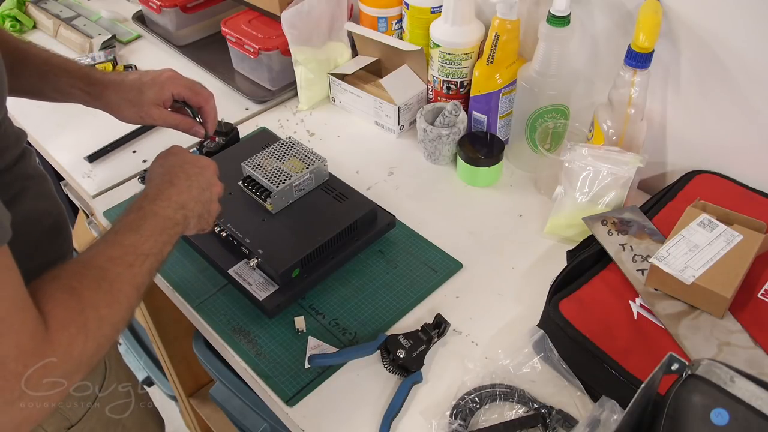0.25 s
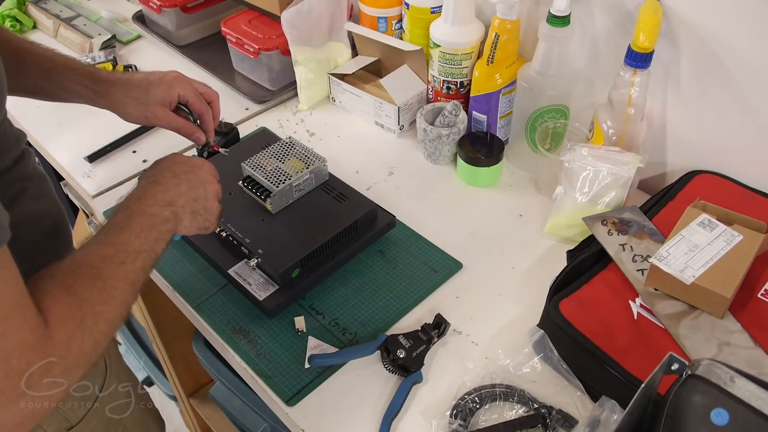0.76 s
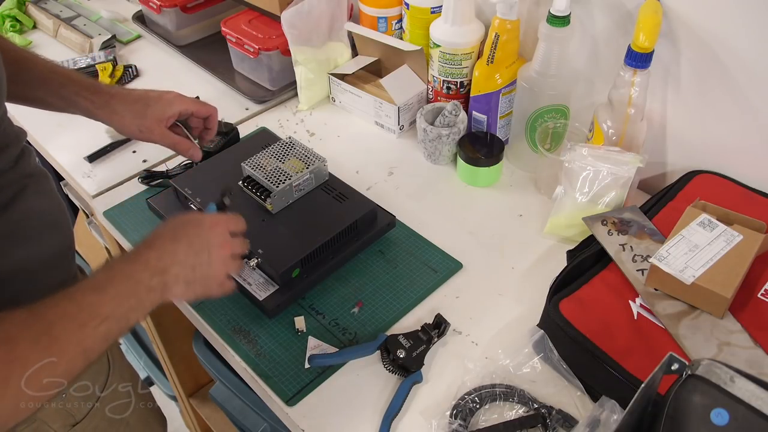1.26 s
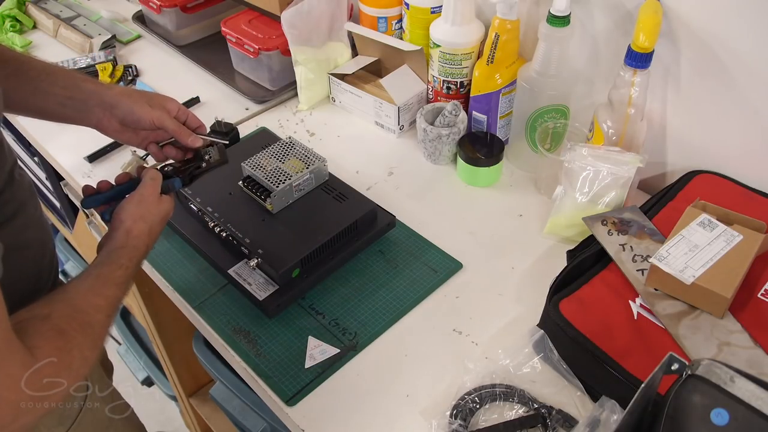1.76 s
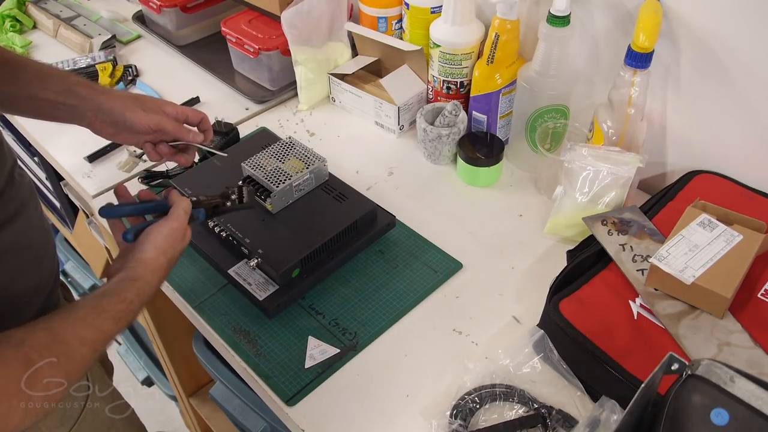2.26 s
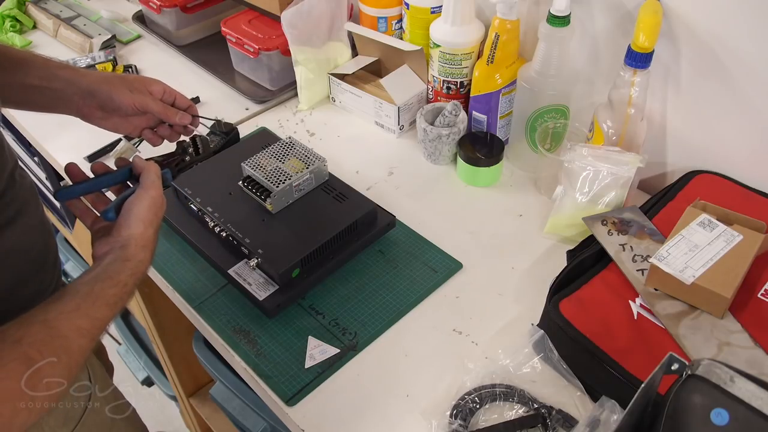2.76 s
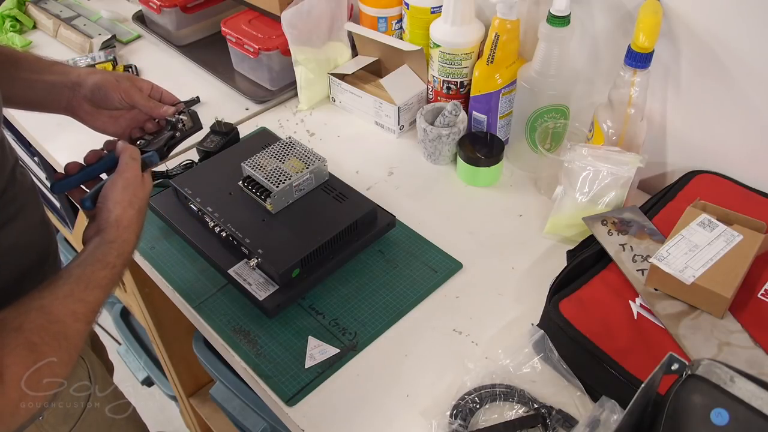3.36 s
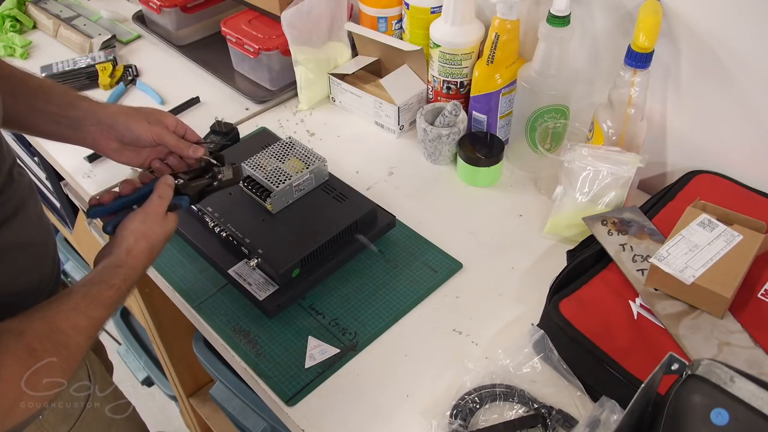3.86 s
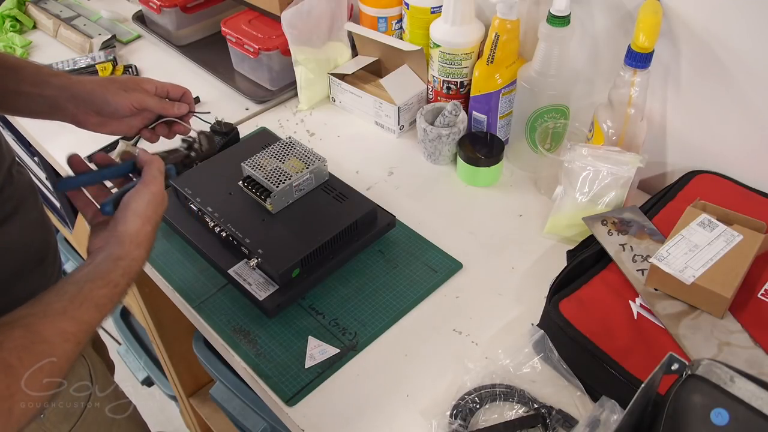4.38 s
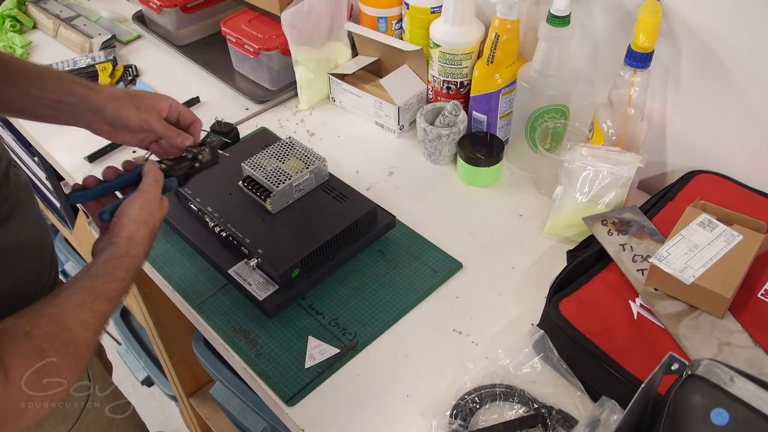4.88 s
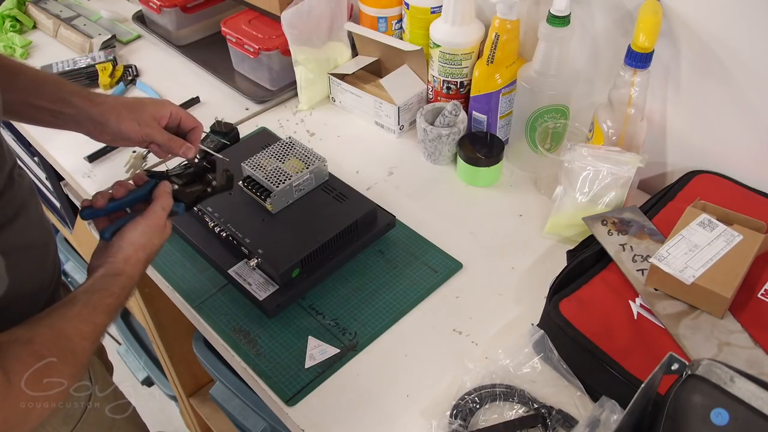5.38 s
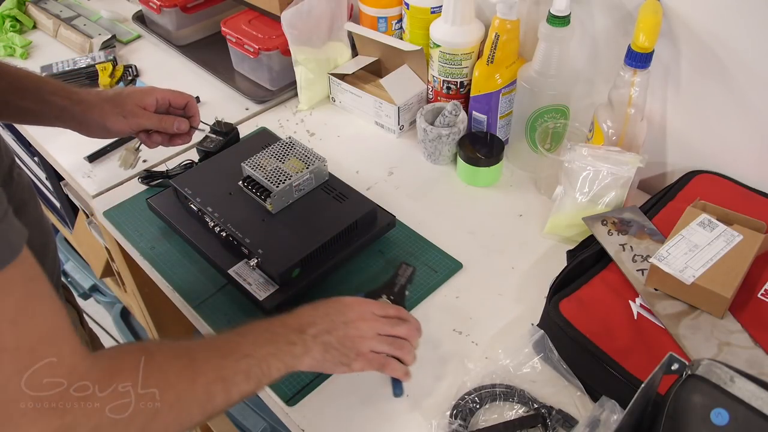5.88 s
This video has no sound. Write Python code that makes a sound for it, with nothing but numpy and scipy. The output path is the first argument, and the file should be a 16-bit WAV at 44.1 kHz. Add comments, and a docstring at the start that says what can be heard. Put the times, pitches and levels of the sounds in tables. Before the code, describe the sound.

One hard wire snip and tiny bouncing ticks, followed by three very loud steel stripper snaps with small creaks between, in a humming, hard-walled workroom.

```python
"""Snipping and stripping wire at a workbench

A fan hums in a hard-walled room: wavering sines over a background of three bands of shaped noise.
A cutter snips a wire and the offcut bounces on the bench; then a sprung steel stripper bites, creaks
through its linkage and snaps shut three times. Each contact is gritty noise over decaying modes, answered by
a hiss from the room; damped swings add dull knocks and short thuds. The nearly mono sound clips on the snaps."""
import sys
import numpy as np
from scipy import signal
from scipy.fft import rfft, irfft, next_fast_len
from scipy.io import wavfile
from scipy.ndimage import uniform_filter1d, map_coordinates

SR = 44100
rng = np.random.default_rng(int(sys.argv[2]) if len(sys.argv) > 2 else 0)


def wav_out(sig):
    """Save sig, one row per channel (or a flat mono array), as 16-bit PCM at SR to the path in sys.argv[1]."""
    wavfile.write(sys.argv[1], SR, np.round(np.clip(np.atleast_2d(sig).T, -1, 1) * 32767).astype(np.int16))


N = 270112  # samples in the scene

# Spectra of relative power density: (f/Hz, level/dB per Hz). Each noise is levelled after shaping.
RUMBLE_SPECTRUM = [(12, -42.5), (20, -17.5), (27, -17), (48, -8), (64, 2), (91, -14), (110, 0.5),
                   (140, -26.5), (240, -120)]
RUSH_SPECTRUM = [(53, -59.5), (90, -25), (113, -13.5), (144, -12.5), (166, -8), (204, -7), (283, -3),
                 (347, -7.5), (405, -8), (452, -11.5), (589, -11), (825, -15), (953, -17), (1040, -18.5),
                 (1600, -38.5), (2080, -53), (3520, -120)]
HISS_SPECTRUM = [(650, -31), (1100, -1.5), (1360, -1.5), (1630, -3.5), (2970, -10), (3360, -8), (3600, -11),
                 (4930, -17), (8970, -26), (13900, -31), (16300, -39)]
WIDTH_SPECTRUM = [(18, -45), (30, -14.5), (131, -26.5), (194, -30.5), (239, -12), (295, -23.5),
                  (404, -11.5), (473, -12), (1010, 7), (3670, -22.5), (4300, -29), (14000, -17.5),
                  (16000, -25.5)]  # the part that differs between the channels
BENCH_CRACK = [(60, -120), (350, -38), (700, -21.5), (1300, -9), (1900, -4), (2800, -4.5), (3800, 2),
               (5000, -10), (6000, -6), (9000, -13), (13800, -8.5), (16000, -22)]
JAW_CRACK = [(60, -120), (400, -50), (900, -27.5), (1800, -12.5), (2500, -11.5), (3000, -1), (4200, -5),
             (5200, -4), (6700, 3), (10000, -0.5), (14500, -3), (16000, -8)]
# Background level over time; the hiss drops abruptly near 1.43 s and lifts faintly near 3.3 s:
# (t/s, rumble level/dB, rush level/dB, hiss level/dB)
BACKGROUND_LEVELS = [(0, -60, -44.5, -53), (1.41, -61, -45, -53), (1.45, -63, -45.5, -57),
                     (2.3, -69, -47, -56), (3.15, -68, -46.5, -57), (3.28, -68, -46, -54.5),
                     (3.55, -68, -47, -57), (6.12, -71, -46, -57)]
# Fan motor tones: (f/Hz, level/dB, waver/Hz, swell/dB)
FAN_TONES = [(59.3, -71, 2.2, 1), (168.9, -60.5, 9.2, 5), (292.8, -57.5, 14, 4), (593, -65.5, 5, 2.5),
             (871, -67, 4.5, 0.5), (929, -57, 3, 2), (988, -65, 4, 0.5), (1425, -70.5, 8.8, 2.5)]
# Resonances in low, high and frame groups: (f/Hz, relative level/dB, t60/s)
BENCH_MODES = {"low": [(1400, -6, .018), (1650, -2, .024), (1900, 0, .026), (2300, -6, .016)],
               "high": [(3100, -4, .012), (3400, 0, .016), (8200, -26, .05)], "frame": [(2750, -15, .025),
               (3300, -15, .03), (3550, -14, .04), (3720, -12, .045), (4060, -11, .04), (4430, -14, .03)]}
JAW_MODES = {"low": [(1700, -8, .01), (2200, 0, .014), (2600, -5, .012), (3400, -4, .018)],
             "high": [(7400, -9, .025), (10700, -12, .03), (12250, -3, .06), (12440, 0, .09),
             (14000, -9, .04)], "frame": [(3060, -18.5, .045), (3100, -31, .14), (3660, -32, .07),
             (4440, -30, .05)]}
# Reverberation time of the hard walls: (f/Hz, t60/s)
WALL_DECAY = [(500, 0.27), (2000, 0.7), (4000, 0.9), (7000, 0.65), (11000, 0.39), (16000, 0.32)]
# Dull knocks passed into the bench and the hand: (t/s, level/dB, f/Hz, t60/s)
KNOCKS = [(0.9111, -27, 438, 0.036), (1.023, -21, 650, 0.048), (1.1935, -36, 691, 0.033),
          (1.8585, -33.5, 1060, .03)]
# Character of each kind of contact:
# (rattle t60/s, tilt/dB per octave, low modes level/dB, high modes level/dB)
CONTACT_SOUND = {"nip": (.033, -4, 2.5, -13), "shear": (.077, 0, -13, -21), "snip": (.032, 4, -26, -9),
                 "touch": (.04, -3, -20, -40), "bite": (.033, -2, -9, -40), "creak": (.026, 4, -40, -20),
                 "ping": (.05, 2, -40, -3), "slide": (.05, -1.5, -40, -40), "slam": (.055, 1, -25, -35),
                 "snap": (.024, .5, -17, -26), "rebound": (.04, 2, -40, 6)}

# All contact levels below are relative; blows() trims them.
# The cutter closing through the wire: (kind, t/s, level/dB)
CUTTER = [("nip", .9095, -21.5), ("shear", 1.0216, -3.5), ("snip", 1.023, 0)]
# The offcut on the bench: (t/s, level/dB, low modes level/dB, high modes level/dB)
BOUNCES = [(1.1936, -35, 14, -5), (1.1985, -40, 11, -5), (1.2115, -14.5, -4, -1), (1.2376, -31, 0, -3),
           (1.2458, -36, 12, -3), (1.253, -41, 7, -5), (1.268, -40, 2, -4), (1.2825, -38, 0, -6),
           (1.2853, -22, -8, 3), (1.3055, -37, -2, -2), (1.3103, -33, -10, 9), (1.3158, -33, -9, 2),
           (1.3295, -35, -9, 0), (1.344, -41, -4, 0), (1.36, -43, -4, 3), (1.3915, -43, 2, -10)]
# Jaws meeting the wire: (t/s, level/dB)
TOUCHES = [(1.8562, -21), (1.859, -26), (3.754, -37), (3.760, -35), (5.187, -29.5), (5.195, -34.5)]
# Jaws clamping: (t/s, level/dB)
BITES = [(1.8678, -21), (3.7655, -20), (5.2022, -21.5)]
# Faint bright ticks: (t/s, level/dB)
CREAKS = [(2.0575, -37), (2.067, -38), (2.078, -38), (2.1155, -27), (3.155, -47), (3.2044, -52),
          (3.8826, -42), (3.9126, -41), (4.754, -51), (5.3115, -50), (5.3293, -39), (5.4015, -45),
          (5.4337, -35), (5.567, -37), (6.0894, -52)]
# Ticks that ring the spring: (t/s, level/dB)
PINGS = [(2.089, -30.5), (2.094, -28), (3.8908, -38), (3.9505, -30), (5.409, -34)]
# Linkage clicks: (t/s, level/dB, rattle t60/s, tilt/dB per octave)
CLICKS = [(2.1082, -12, .033, 6), (3.925, -26.5, .032, -5), (3.965, -16.5, .036, 0),
          (5.366, -27, .025, -3.5), (5.44, -18.5, .041, 1.5), (5.669, -35, .03, -6)]
# Jaws snapping shut: (t/s, snap level/dB, slam level/dB, rebound level/dB, thud level/dB)
SNAPS = [(2.1508, 2.5, -21, -24, -26), (3.9988, 2.5, -11.5, -22, -25), (5.4783, 2, -13, -38, -14)]

WIDTH_DB = -68  # rms of the difference added to one channel and taken from the other
BOUNCE_T60_S, BOUNCE_GROWTH = .027, .3  # rattle of a -20 dB bounce; dB longer per dB harder
BOUNCE_TILT_DB = -6  # per octave
CLICK_LOW_DB, CLICK_HIGH_DB = -5, -28  # mode levels of a linkage click
SLIDE_LEAD_S, SLAM_LEAD_S, SLIDE_DB = .013, .0075, -13  # leads before the snap; slide relative to slam
REBOUND_DELAY_S = .011  # after the snap; the rebound sets the spring ringing
THUD_DELAY_S, THUD_HZ, THUD_T60_S = .0007, 80, .0045  # the push into the hand, just after the snap
BAND_LIMIT_HZ = 16150  # middle of the top roll-off


def amp(db):
    """Decibels to amplitude."""
    return 10 ** (np.asarray(db) / 20)


def unit(x):
    """Scale a signal to rms 1."""
    return x / np.sqrt(np.mean(x ** 2) + 1e-20)


def along(points, hz):
    """Read (f/Hz, value) points on a log frequency axis."""
    f, value = np.transpose(points)
    return np.interp(np.log(hz + 1), np.log(f + 1), value)


def tilted(spectrum, hz, tilt_db):
    """A dB spectrum tilted about 4 kHz per octave; the tilt stays level below 800 Hz."""
    return along(spectrum, hz) + tilt_db * np.log2(np.maximum(hz, 800) / 4000)


def wobble(rate):
    """A smooth random curve through rate knots a second."""
    knots = rng.standard_normal(int(N * rate / SR) + 4)
    return map_coordinates(knots, [np.arange(N) * rate / SR])


def filtered(x, response):
    """Shape a signal by a gain given as a function of frequency."""
    size = next_fast_len(x.shape[-1] + 8192)
    gain = response(np.fft.rfftfreq(size, 1 / SR))
    return irfft(rfft(x, size) * gain, size)[..., :x.shape[-1]]


def noise(spectrum, size, tilt_db=0):
    """Coloured noise of rms 1."""
    white = rng.standard_normal(size)
    return unit(filtered(white, lambda hz: amp(tilted(spectrum, hz, tilt_db))))


def fan_and_background():
    """Slightly unsteady motor tones over a background of rumble, rush and hiss from shaped noise."""
    t, *levels = np.transpose(BACKGROUND_LEVELS)
    rumble_db, rush_db, hiss_db = [np.interp(np.arange(N) / SR, t, level) for level in levels]
    tones = np.zeros(N)
    for hz, db, waver_hz, swell_db in FAN_TONES:
        level = np.sqrt(2) * amp(db + swell_db * wobble(12))  # rms to peak
        phase = 2 * np.pi * np.cumsum(hz + waver_hz * wobble(25)) / SR
        tones += level * np.sin(phase)
    rumble = amp(rumble_db) * noise(RUMBLE_SPECTRUM, N)
    rush = amp(rush_db + 0.92 * wobble(9)) * noise(RUSH_SPECTRUM, N)
    hiss = amp(hiss_db + .3 * wobble(4.3)) * noise(HISS_SPECTRUM, N)
    return tones + rumble + rush + hiss


def stereo_width():
    """Faint noise in opposite polarity on the two channels opens the image slightly."""
    wide = amp(WIDTH_DB) * noise(WIDTH_SPECTRUM, N)
    return np.array([wide, -wide])


def ringing(modes, t):
    """Decaying sines of the struck metal or bench, each at a fresh random strength."""
    ring = np.zeros(len(t))
    for hz, db, t60 in modes:
        ring += amp(db + rng.normal(0, 2) - 60 * t / t60) * np.sin(2 * np.pi * hz * t)
    return ring


def echo(fill_s, size):
    """A fresh room tail of energy 1: it fills up while each frequency dies at its own speed."""
    hz, t, bins = signal.stft(rng.standard_normal(size), SR, nperseg=256)
    decay = amp(-60 * t / along(WALL_DECAY, hz)[:, None])
    fill = 1 - np.exp(-t / fill_s)
    tail = signal.istft(bins * decay * fill, SR, nperseg=256)[1]
    return tail / np.linalg.norm(tail)


def blows(rows, crack, modes, grain_db, wet_db, wet_ring_db):
    """Each contact is a burst of tiny impacts over ringing modes; the room returns rattle and frame."""
    out, t = np.zeros(N + SR), np.arange(SR // 8) / SR
    for start_s, db, t60, tilt_db, low_db, high_db in rows:
        t60 = max(t60, .004)
        rise = 1 - np.exp(-t / (8 * t60 ** 3))  # long scrapes swell, short knocks start almost at once
        fade = amp(-60 * t / t60) * rise
        energy = np.linalg.norm(fade)

        grit = amp(grain_db * unit(uniform_filter1d(rng.standard_normal(len(t)), size=20)))  # uneven impacts
        rattle = noise(crack, len(t), tilt_db) * fade * grit
        rattle *= energy / np.linalg.norm(rattle)
        low = amp(low_db) * ringing(modes["low"], t)
        high = amp(high_db) * ringing(modes["high"], t)
        ring = rise * (low + high)
        frame = rise * amp(.6 * db) * ringing(modes["frame"], t)  # grows faster than the blow

        # faint tails soon sink under the fan, so they are cut short
        tail = echo(fill_s=.04, size=3 * SR // 4 if db > -7 else SR // 4)
        wash = filtered(tail, lambda hz: amp(tilted(crack, hz, tilt_db)))  # the rattle comes back as even hiss
        wash *= energy / np.linalg.norm(wash)
        wet_frame = signal.fftconvolve(frame, tail)[:len(tail)]
        wet = amp(wet_db) * wash + amp(wet_ring_db) * wet_frame

        start = round(start_s * SR)
        out[start:][:len(t)] += amp(db - 6) * (rattle + ring + frame)
        out[start:][:len(wet)] += amp(db - 9) * wet
    return out[:N]


def bench_contacts():
    """The cutter shears the wire, then the offcut bounces; harder bounces rattle longer."""
    contacts = [(t, db, *CONTACT_SOUND[kind]) for kind, t, db in CUTTER]
    for t, db, low_db, high_db in BOUNCES:
        t60 = BOUNCE_T60_S * amp(BOUNCE_GROWTH * (db + 20))
        contacts.append((t, db, t60, BOUNCE_TILT_DB, low_db, high_db))
    return contacts


def knocks_and_thuds():
    """Dull knocks are damped swings that briefly ring; snap thuds are one short push."""
    out, t = np.zeros(N + SR), np.arange(SR // 10) / SR
    thuds = [(snap_s + THUD_DELAY_S, db, THUD_HZ, THUD_T60_S) for snap_s, *_, db in SNAPS]
    for start_s, db, hz, t60 in KNOCKS + thuds:
        swing = np.cos(2 * np.pi * hz * t) * (1 - np.exp(-t / .0003))
        out[round(start_s * SR):][:len(t)] += amp(db - 60 * t / max(t60, .002)) * swing
    return out[:N]


def jaw_contacts():
    """Contacts inside the stripper; sliding and slamming lead each snap, a springy rebound follows."""
    t, snap_db, slam_db, rebound_db, _ = np.transpose(SNAPS)
    tables = {
        "touch": TOUCHES, "bite": BITES, "creak": CREAKS, "ping": PINGS,
        "slide": zip(t - SLIDE_LEAD_S, slam_db + SLIDE_DB),
        "slam": zip(t - SLAM_LEAD_S, slam_db),
        "snap": zip(t, snap_db),
        "rebound": zip(t + REBOUND_DELAY_S, rebound_db),
    }
    contacts = [(s, db, *CONTACT_SOUND[kind]) for kind, rows in tables.items() for s, db in rows]
    return contacts + [(*click, CLICK_LOW_DB, CLICK_HIGH_DB) for click in CLICKS]


def scene():
    """Layer the fan and background, bench, knocks and stripper, with a little stereo width."""
    background = fan_and_background() + stereo_width()
    bench = blows(bench_contacts(), BENCH_CRACK, BENCH_MODES, grain_db=2, wet_db=-13.5, wet_ring_db=-15)
    jaws = blows(jaw_contacts(), JAW_CRACK, JAW_MODES, grain_db=1.2, wet_db=-12.5, wet_ring_db=-13.5)
    return background + bench + knocks_and_thuds() + jaws


def record(dry):
    """The converter clips with a rounded knee near full scale, then the top of the band rolls off."""
    clipped = dry / (1 + np.abs(dry / .95) ** 6) ** (1 / 6)
    return filtered(clipped, lambda hz: np.clip((BAND_LIMIT_HZ + 250 - hz) / 500, 0, 1) ** 2)


dry = scene()
out = record(dry)
wav_out(out)
```